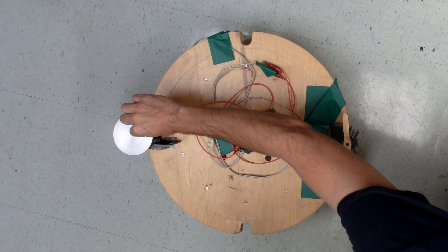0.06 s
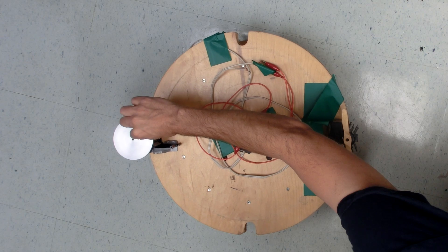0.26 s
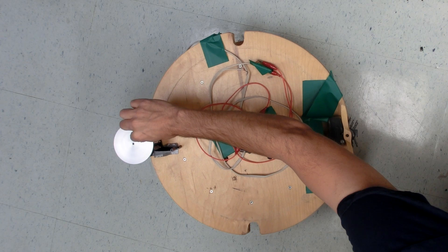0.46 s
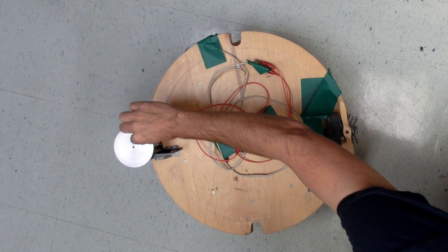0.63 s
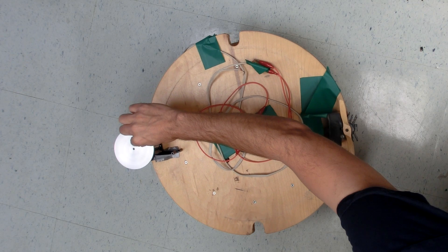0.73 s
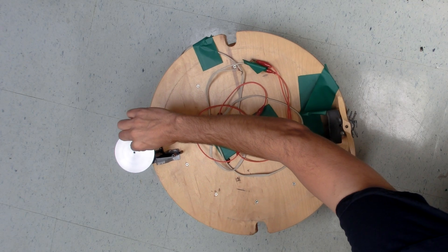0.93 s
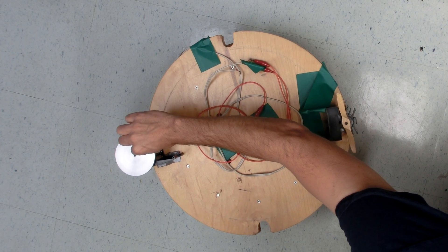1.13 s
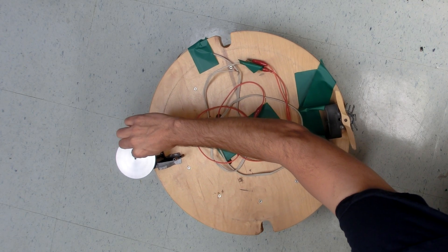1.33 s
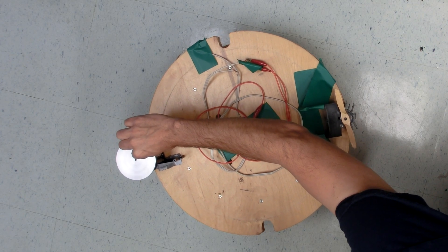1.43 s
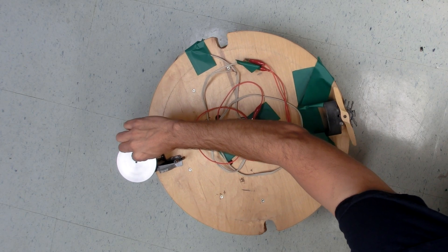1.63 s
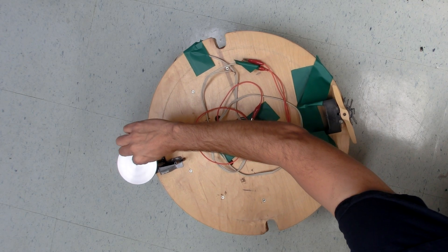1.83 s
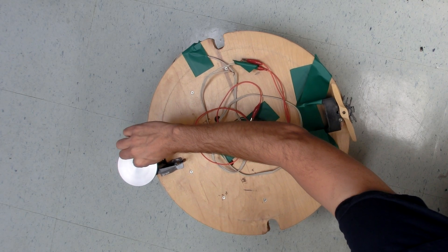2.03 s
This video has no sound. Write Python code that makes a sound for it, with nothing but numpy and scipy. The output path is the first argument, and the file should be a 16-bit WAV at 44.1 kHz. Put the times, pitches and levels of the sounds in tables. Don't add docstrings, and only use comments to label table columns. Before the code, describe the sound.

A sustained piercing metallic squeal wavers between close high pitches as fingertips drag on a turning disk, with faint scuffs, soft fan rumble indoors, and a final light knock on wood; stereo microphone at arm's length.

```python
import sys
import numpy as np
from scipy import signal
from scipy.fft import rfft, irfft, next_fast_len
from scipy.io import wavfile
from scipy.ndimage import uniform_filter1d, map_coordinates

SR = 44100
rng = np.random.default_rng(int(sys.argv[2]) if len(sys.argv) > 2 else 0)


def put_to_file(sound):
    columns = np.atleast_2d(sound).T
    safe = np.clip(columns, -1, 1)
    whole_steps = np.round(safe * 32767)
    wavfile.write(sys.argv[1], SR, whole_steps.astype(np.int16))


def ratio_of_db(decibels):
    return 10 ** (np.asarray(decibels, float) / 20)


N = 92213

# t/s, level/dB
PRESSURE = [(0, -72), (.12, -69), (.25, -59), (.5, -59.5), (.68, -56.5), (.84, -54.5), (.92, -57),
            (1.06, -60), (1.14, -55), (1.28, -55.5), (1.42, -59), (1.53, -56), (1.75, -56), (1.86, -57),
            (1.92, -62), (2.09, -59.5)]
# f/Hz, density/dB
RUB_SPECTRUM = [(900, -44), (1600, -2.5), (2300, -1), (3000, -4), (4900, 0.5), (6200, -6), (10000, -6),
                (12500, -22)]
# t/s, peak level/dB
SKIN_CATCHES = [
    (0.6474, -40),
    (0.7994, -50),
    (1.0994, -52),
    (1.2494, -38),
    (1.497, -35),
    (1.5234, -48),
    (1.5994, -41),
    (1.7065, -35),
    (1.8494, -40),
]
# t/s, level/dB, share of energy in the upper twin/0-1
LOW_PAIR_GRIP = [(0.0, -47, 0.95), (0.19, -54, 0.8), (0.22, -44.5, 1), (0.37, -44.5, 0.6),
                 (0.41, -50, 0.44), (0.7, -54, 0.12), (0.74, -39, 0), (0.8, -51, 0.3), (0.85, -47.5, 0.02),
                 (1.05, -50, 0.34), (1.12, -42.5, 0), (1.31, -50.5, 0.1), (1.42, -49.5, 0.1),
                 (1.45, -52, 0.54), (1.72, -46, 0), (1.89, -51, 0.3), (2.0, -49, 0.97), (2.09, -55.5, 0.5)]
# t/s, level/dB, share of energy in the upper twin/0-1
HIGH_PAIR_GRIP = [(0.0, -50, 0.42), (0.2, -49.5, 0.03), (0.25, -40.5, 0.039), (0.32, -52.5, 0.099),
                  (0.38, -42.5, 0.056), (0.52, -42.5, 0.18), (0.62, -45.5, 0.61), (0.84, -47.5, 0.98),
                  (0.88, -52, 0.26), (1.0, -48.5, 0.14), (1.21, -51, 0.28), (1.25, -39, 0.089),
                  (1.34, -46.5, 0.33), (1.54, -40.5, 0.3), (1.74, -43.5, 1), (1.79, -38, 0.5),
                  (1.92, -51, 0.31), (2.09, -43, 0.9)]
# f/Hz, width/Hz, port likeness/0-1, left lead/rad
LOW_PAIR_MODES = [(4058, 11, .9, .1), (4112, 22, .9, .1), (4110, 110, .85, .1)]
# f/Hz, width/Hz, port likeness/0-1, left lead/rad
HIGH_PAIR_MODES = [(9226, 11, .7, .7), (9301, 22, .65, .7), (9268, 65, .65, .7)]
# t/s, middle mode level/dB, top mode level/dB
SINGLE_GRIP = [(0.0, -65, -64), (0.16, -57.5, -58), (0.52, -77, -65), (0.56, -62, -68), (0.81, -54.5, -66),
               (0.87, -60, -58), (0.97, -88, -59), (1.07, -62, -57), (1.12, -65, -70), (1.43, -68, -61),
               (1.57, -78, -66), (1.59, -68.5, -70), (2.05, -58, -64), (2.09, -58, -62)]
# f/Hz, width/Hz, port likeness/0-1, left lead/rad
SINGLE_MODES = [(7110, 70, .85, .7), (15395, 36, .8, 1.8)]
# f/Hz, width/Hz, level over the rub/dB
FAINT_MODES = [(2413, 25, -18), (3600, 50, -13), (4373, 18, -11), (5220, 50, -15), (8191, 12, -16),
               (9385, 30, -9), (9495, 60, -11)]
# f/Hz, density/dB
RUMBLE_SPECTRUM = [(8, -25), (30, -12), (50, 1.5), (100, -2.5), (115, -3.5), (142, -14), (200, -12.5),
                   (300, -38.5)]
# f/Hz, density/dB
ROOM_SPECTRUM = [(200, -1.5), (400, -8), (1200, -14), (3000, -19.5), (6000, -24.5), (10000, -18.5),
                 (12500, -23.5), (15500, -16.5)]
# f/Hz, width/Hz, level/dB
HUM_LINES = [(59, 7, -49), (72, 7, -54), (122, 7, -48), (159, 6, -52), (249, 4, -62), (361, 4, -67),
             (15738, 8, -71), (16, 5, -56)]
# t/s, level/dB
FAN_SURGE = [(0.0, -49), (0.17, -52.5), (0.2, -41), (0.65, -51), (0.67, -44), (0.91, -53.5), (0.97, -42.5),
             (1.48, -50), (1.52, -63), (1.57, -43.5), (2.07, -47), (2.09, -33)]
# f/Hz, level/dB, T60/s
TICK_MODES = [(3350, -3, .02), (3650, -4, .01)]
# f/Hz, level/dB, T60/s
WOOD_MODES = [(646, 0, .055), (990, -1, .05), (1300, -6, .025)]
# f/Hz, density/dB
THUD_SPECTRUM = [(200, -32), (500, 0), (1400, 0), (2200, -14), (3500, -4), (5000, -30)]
# f/Hz, likeness/-1 to 1
PORT_LIKENESS = [(60, 1), (130, 0.98), (290, 0.95), (640, 0.75), (1410, 0.82), (3100, 0.84), (6820, 0.39),
                 (15000, -0.06)]
# f/Hz, lead/rad
PORT_LEAD = [(300, 0), (4000, 0), (8000, 0), (12000, 0), (15500, 1.6)]
# f/Hz, level/dB
LEFT_OVER_RIGHT = [(60, 3.5), (1500, 2.5), (5000, 4), (9000, 2), (15000, 2)]

RUB_OVER_DB, CHATTER_DB, RUB_PATCH_DB = 4.5, 0.73, 1.35
SCUFF_OVER_DB, SCUFF_T60_S, SCUFF_RISE_S = -9, 0.12, .003
SKIRT_DB, PAIR_OVER_DB, SINGLE_OVER_DB = -11.5, 0.86, 3.1
LOW_DAMPED_DB, HIGH_DAMPED_DB = -1, 1.5
FLUTTER_DB = 2.02
STEADY = .8
STEEP = 1.32
RUMBLE_DB, ROOM_DB = -48.5, -50.5
KNOCK_S, KNOCK_DB, BODY_LATE_S = 2.0672, -35.5, 0.00127
THUD_DB, THUD_T60_S = -9, 0.034
TOP_HZ = 15800


def unit(x):
    return x / np.sqrt(np.mean(x ** 2) + 1e-20)


def along(points, hz):
    f, v = np.transpose(points)
    return np.interp(np.log(hz + 1), np.log(f + 1), v)


def curves(rows):
    s, *cols = np.transpose(rows)
    return [np.interp(np.arange(N) / SR, s, c) for c in cols]


def wobble(rate):
    return map_coordinates(rng.standard_normal(N // 100), [np.arange(N) * rate / SR])


def filtered(x, response):
    m = next_fast_len(N + 8192)
    return irfft(rfft(x, m) * response(np.fft.rfftfreq(m, 1 / SR)), m)[..., :N]


def ports(pair, colour, alike, lead):
    m = next_fast_len(N + 8192)
    f = np.fft.rfftfreq(m, 1 / SR)
    a, b = rfft(pair, m) * colour(f)
    turn = np.arccos(np.clip(alike(f), -1, 1)) / 2
    half_lead = np.exp(.5j * lead(f))
    mid, side = a * np.cos(turn), b * np.sin(turn)
    out = irfft([(mid + side) * half_lead, (mid - side) / half_lead], m)[:, :N]
    return out / np.sqrt(np.mean(out.mean(0) ** 2))


def rush(spectrum, patchy_db):
    z = signal.stft(rng.standard_normal((2, N + 512)), nperseg=512)[2]
    field = uniform_filter1d(rng.standard_normal(z.shape[1:]), size=6, axis=0)
    field = uniform_filter1d(field, size=10, axis=1)
    pair = signal.istft(z * ratio_of_db(patchy_db * unit(field)), nperseg=512)[1][:, :N]
    return ports(pair, lambda f: ratio_of_db(along(spectrum, f)),
                 lambda f: along(PORT_LIKENESS, f), lambda f: along(PORT_LEAD, f))


def mode(hz, width, alike, lead, steady):
    def resonance(f):
        return np.abs(f * width / (hz * hz - f * f + 1j * f * width)) ** STEEP

    ring = ports(rng.standard_normal((2, N)), resonance, lambda f: alike, lambda f: lead)
    swell = np.abs(uniform_filter1d(ring.mean(0) ** 2, size=3000)) + .02
    ring = ring / swell ** (np.clip(steady, 0, 1) / 2)
    return ring / np.sqrt(np.mean(ring.mean(0) ** 2))


def skin_hiss(rub):
    t = np.arange(N) / SR
    catches = 0
    for start, db in SKIN_CATCHES:
        since = (t - start).clip(0)
        rise = 1 - np.exp(-since / SCUFF_RISE_S)
        catches = catches + rise * ratio_of_db(db + SCUFF_OVER_DB - 60 * since / SCUFF_T60_S)
    return np.hypot(rub, catches) * rush(RUB_SPECTRUM, RUB_PATCH_DB)


def twins(grip, modes, damped):
    db, upper = curves(grip)
    upper = upper.clip(0, 1)
    level = ratio_of_db(db + PAIR_OVER_DB + FLUTTER_DB * wobble(18))
    skirt = np.hypot(level * ratio_of_db(SKIRT_DB), damped)
    gains = [level * np.sqrt(1 - upper), level * np.sqrt(upper), skirt]
    return sum(gain * mode(*row, STEADY) for gain, row in zip(gains, modes))


def disk():
    press_db, = curves(PRESSURE)
    chatter_db = CHATTER_DB * (wobble(13.85) + wobble(39.8))
    rub = ratio_of_db(press_db + RUB_OVER_DB + chatter_db)
    sound = skin_hiss(rub)
    sound = sound + twins(LOW_PAIR_GRIP, LOW_PAIR_MODES, rub * ratio_of_db(LOW_DAMPED_DB))
    sound = sound + twins(HIGH_PAIR_GRIP, HIGH_PAIR_MODES, rub * ratio_of_db(HIGH_DAMPED_DB))
    for row, db in zip(SINGLE_MODES, curves(SINGLE_GRIP)):
        sound = sound + ratio_of_db(db + SINGLE_OVER_DB) * mode(*row, STEADY)
    for hz, width, db in FAINT_MODES:
        faint = mode(hz, width, along(PORT_LIKENESS, hz), along(PORT_LEAD, hz), 0)
        sound = sound + rub * ratio_of_db(db) * faint
    return sound


def lab():
    surge_db, = curves(FAN_SURGE)
    throb = ratio_of_db(surge_db - surge_db.mean())
    rumble = throb ** .5 * ratio_of_db(RUMBLE_DB) * rush(RUMBLE_SPECTRUM, patchy_db=1.5)
    hiss = ratio_of_db(ROOM_DB) * rush(ROOM_SPECTRUM, patchy_db=0.3)
    lines = []
    for hz, width, db in HUM_LINES:
        alike = max(along(PORT_LIKENESS, hz), .6)
        lines.append(ratio_of_db(db) * mode(hz, width, alike, lead=0, steady=0.38))
    return rumble + hiss + throb * (lines[0] + lines[1]) + sum(lines[2:])


def struck(modes, since, rise_s):
    ring = sum(ratio_of_db(db - 60 * since / t60) * np.sin(2 * np.pi * hz * since) for hz, db, t60 in modes)
    return ring * (1 - np.exp(-since / rise_s))


def knock():
    t = np.arange(N) / SR - KNOCK_S
    tick = struck(TICK_MODES, t.clip(0), rise_s=0.00035)
    wood = struck(WOOD_MODES, (t - BODY_LATE_S).clip(0), rise_s=0.0019)
    decay = (t > 0) * ratio_of_db(THUD_DB - 60 * t.clip(0) / THUD_T60_S)
    puff = decay * rush(THUD_SPECTRUM, patchy_db=1)
    return ratio_of_db(KNOCK_DB) * (tick + wood + puff)


def scene():
    return disk() + lab() + knock()


def top_cut(x):
    return signal.sosfilt(signal.butter(12, 15870, fs=SR, output="sos"), x)


def record(dry):
    def port_response(f):
        return ratio_of_db(np.outer([.5, -.5], along(LEFT_OVER_RIGHT, f))) * (f < TOP_HZ)

    mix = filtered(dry, port_response)
    return top_cut(mix)


dry = scene()
out = record(dry)
put_to_file(out)
```